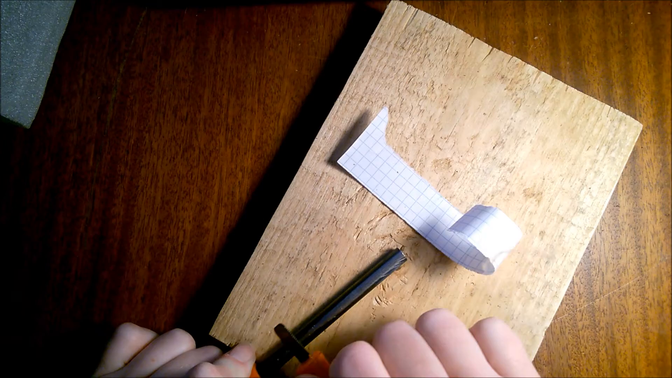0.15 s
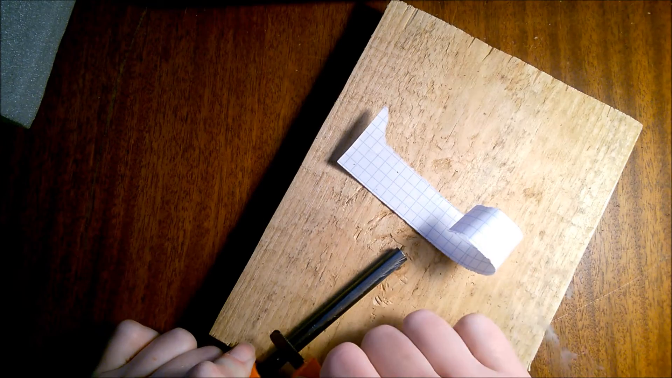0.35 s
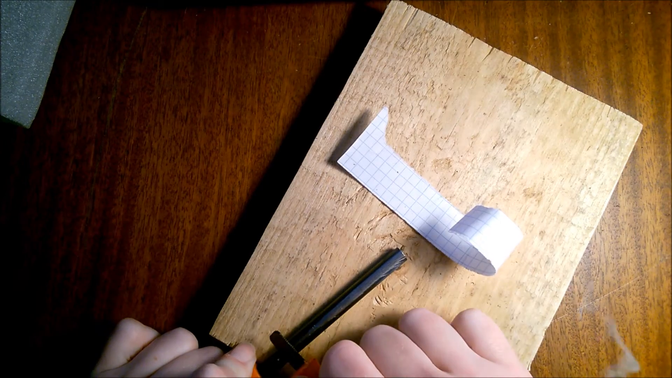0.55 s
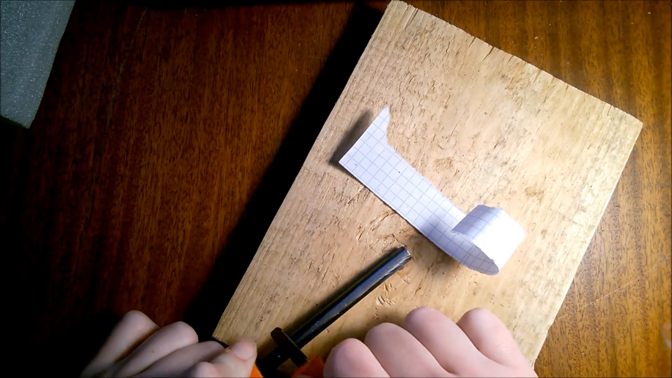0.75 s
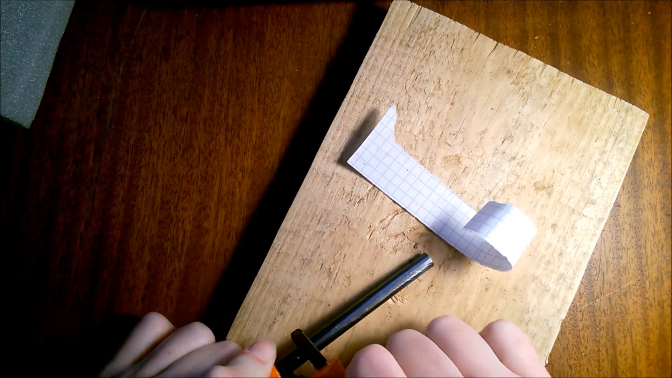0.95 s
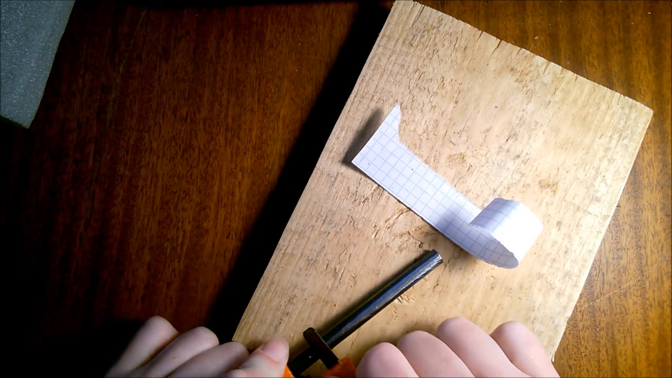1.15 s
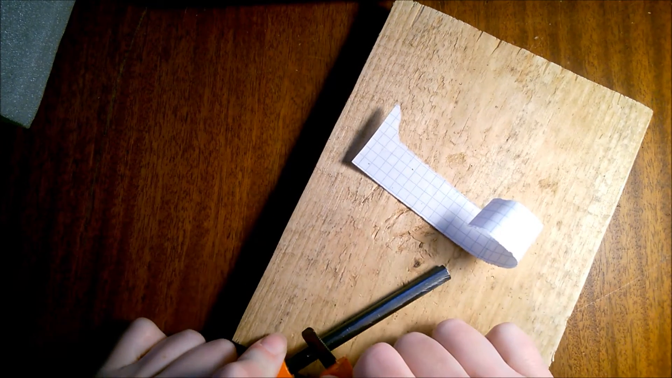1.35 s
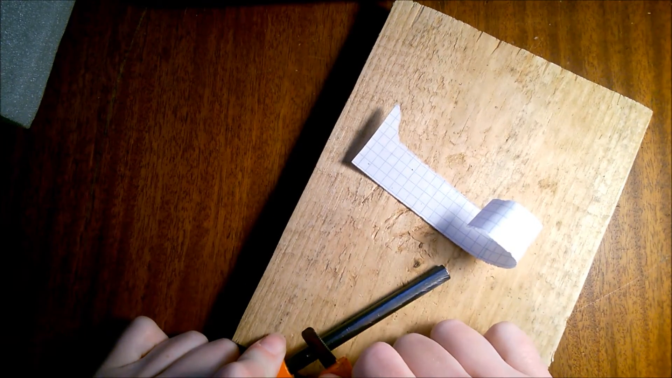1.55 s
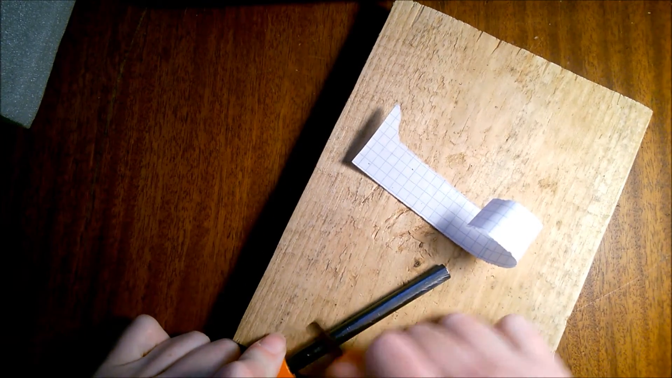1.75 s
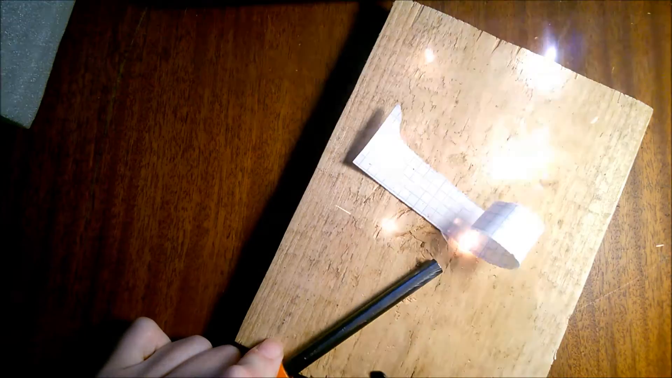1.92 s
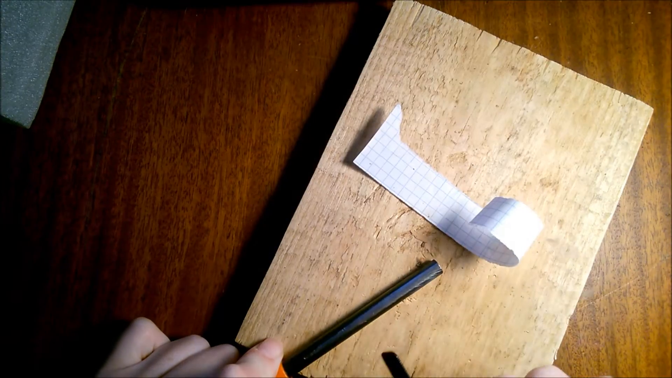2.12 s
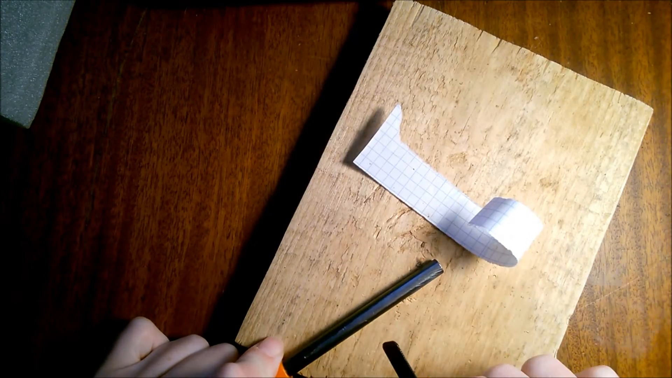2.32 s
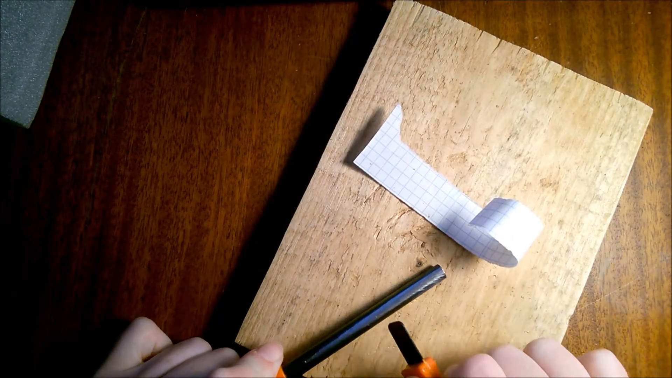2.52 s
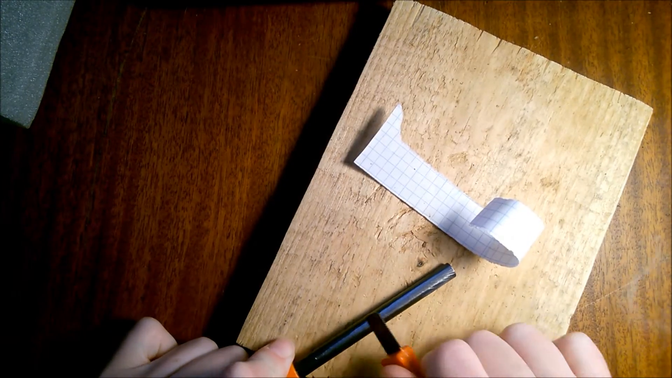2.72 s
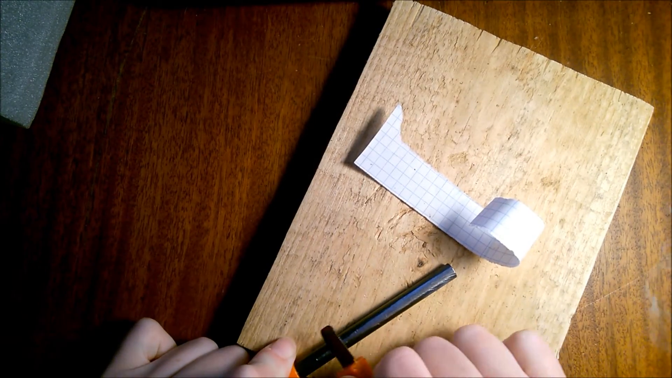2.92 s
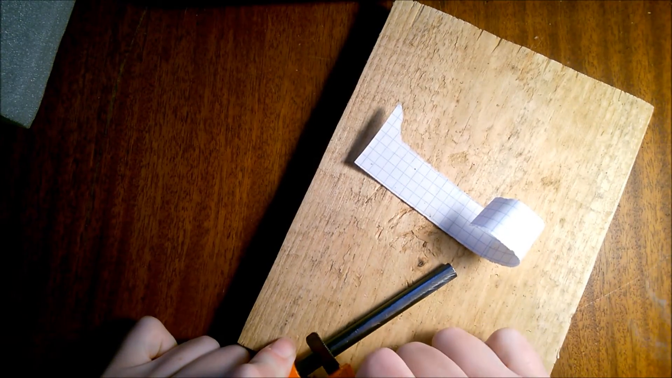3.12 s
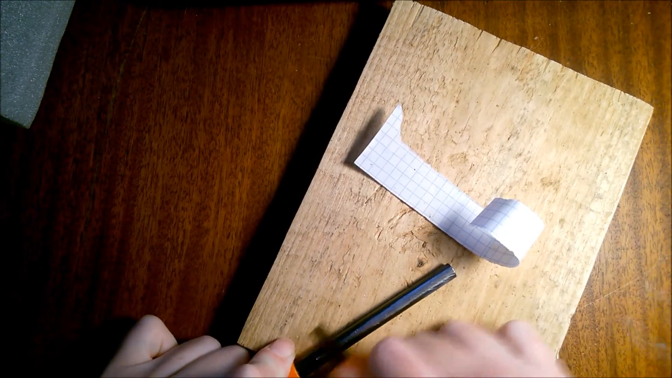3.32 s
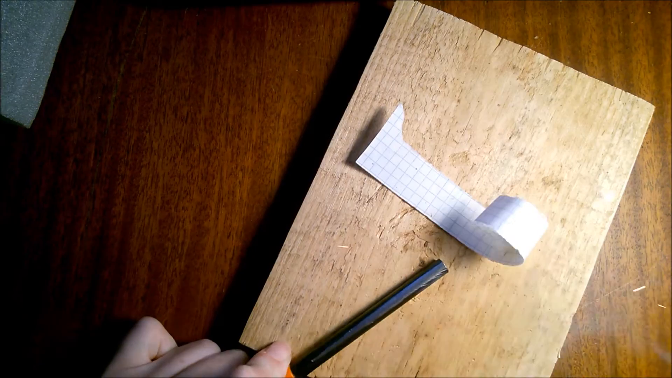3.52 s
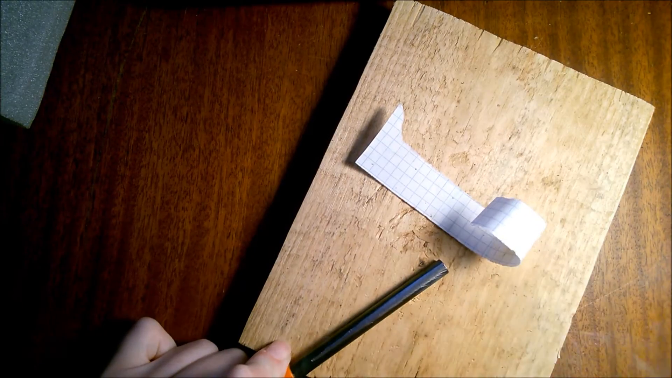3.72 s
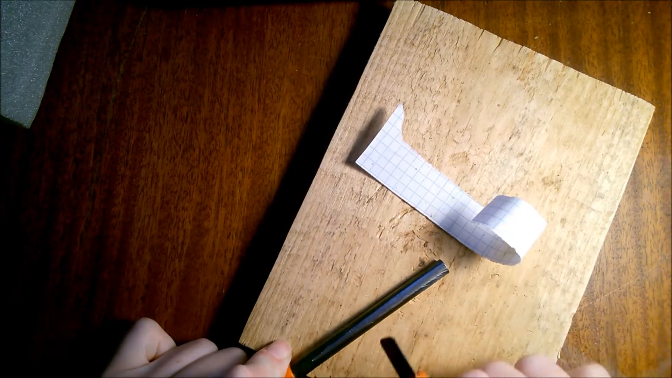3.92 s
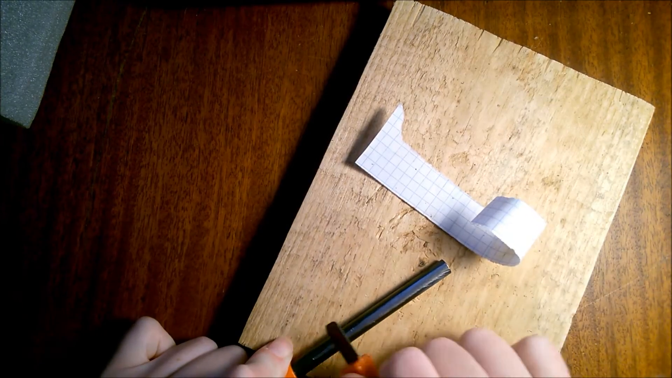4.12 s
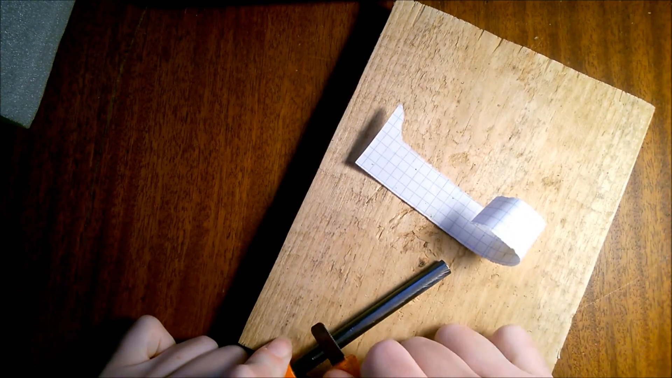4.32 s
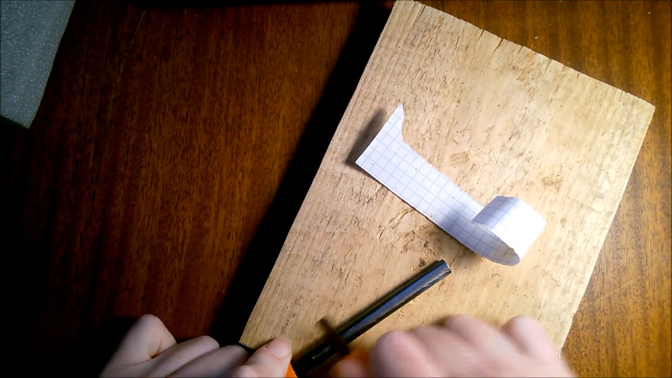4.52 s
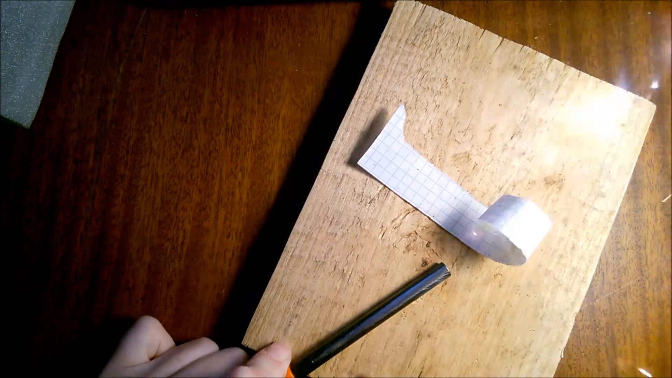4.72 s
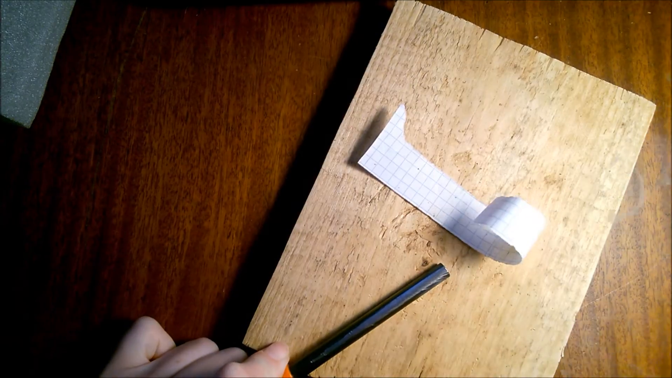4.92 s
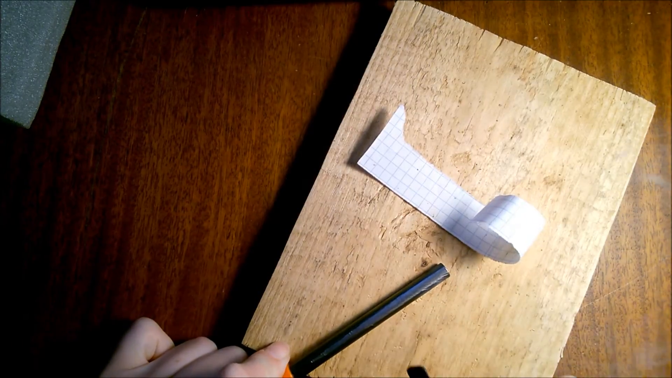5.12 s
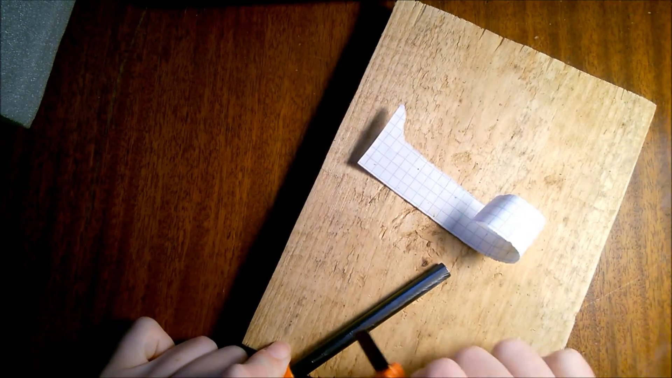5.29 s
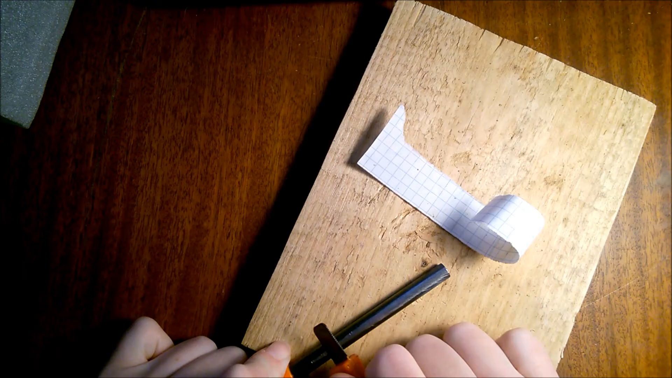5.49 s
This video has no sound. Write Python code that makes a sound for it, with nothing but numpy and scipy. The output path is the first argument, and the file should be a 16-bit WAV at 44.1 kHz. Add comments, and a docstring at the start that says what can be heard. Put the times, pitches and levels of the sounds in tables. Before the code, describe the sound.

A steel striker slides and taps, then scrapes a fire-starting rod hard three times, each short rip spitting sizzling sparks over a wooden board.

```python
"""Striking sparks from a ferrocerium rod

A steel striker scrapes hard, three times, down a rod held on a wooden board on a table in a small room.
Streams of tiny fractures make the rasp and the fizz of sparks, and shake resonances of rod, board and table.
After a stroke the striker flies off the tip and clatters, as noisy contacts ringing the steel.
Between strokes the rod knocks on the board and the striker slides into place; echoes and a hush surround it."""
import sys
import numpy as np
from scipy import signal
from scipy.fft import rfft, irfft
from scipy.io import wavfile

SR = 44100
rng = np.random.default_rng(int(sys.argv[2]) if len(sys.argv) > 2 else 0)


def transcribe(signal):
    """Save signal, clipped to [-1, 1], as a 16-bit WAV file at the path in sys.argv[1]."""
    frames = np.atleast_2d(signal).T
    limited = np.clip(frames, -1, 1)
    pcm = np.round(limited * 32767).astype(np.int16)
    wavfile.write(sys.argv[1], SR, pcm)


N = 244755
T = np.arange(N) / SR  # time in seconds
HZ = np.fft.rfftfreq(8192, 1 / SR) + 1  # frequency grid, kept above zero for logarithms
BEND_HZ = 1175  # the rod's bending mode while it is pressed for a stroke


def undb(db):
    """Decibels to gain."""
    return 10 ** (np.asarray(db) / 20)


def unit(x):
    """Scale to rms 1."""
    return x / np.sqrt(np.mean(x ** 2))


def even(response):
    """Scale a response to unit energy."""
    return response / np.linalg.norm(response)


def through(x, response):
    """Pass a sound through an impulse response."""
    return signal.fftconvolve(x, response)[:len(x)]


def causal(gain):
    """The promptest (minimum-phase) response with this gain at each of HZ, up to a common factor."""
    cepstrum = irfft(np.log(gain))
    half = len(cepstrum) // 2
    # fold the cepstrum onto positive time
    cepstrum[1:half] *= 2
    cepstrum[half:] = 0
    return even(irfft(np.exp(rfft(cepstrum))))


def colour(points):
    """Response with a smooth spectrum, drawn through points on a logarithmic frequency axis."""
    hz, db = np.transpose(points)
    return causal(undb(np.interp(np.log(HZ), np.log(hz), db)))


def ring(modes):
    """Response of a body: resonances with dark valleys between them."""
    gain = 0
    for hz, width_hz, db in modes:
        detuning = 2 * (HZ - hz) / width_hz
        gain = gain + undb(db) / (1 + detuning ** 2) ** (3 / 4)
    return causal(gain)


def soften(x, hz):
    """A softer contact loses its treble above hz."""
    b, a = signal.butter(2, min(hz, SR / 2 - 1000), fs=SR)
    return signal.lfilter(b, a, x)


def crack(decay_s, hz, octaves):
    """A burst of noise around a pitch, dying fast."""
    spectrum = rfft(rng.standard_normal(2 * len(HZ) - 2))
    band = np.exp(-(np.log2(HZ / hz) / octaves) ** 2 / 2)
    noise = irfft(spectrum * band)
    return even(noise * np.exp(-T[:len(noise)] / decay_s))


def chatter(body, decay_s):
    """Hard parts meet in a flurry of tiny contacts, each ringing the body."""
    contacts = rng.standard_normal(len(body)) * np.exp(-T[:len(body)] / decay_s)
    return even(through(body, contacts))


def blow(s, db, shape):
    """Place one blow; its level is its energy spread over 5 ms."""
    span = .005 * SR
    return np.pad(even(shape) * undb(db) * np.sqrt(span), (int(s * SR), N))[:N]


def walk(rate):
    """Random levels joined by lines, rate of them a second."""
    return np.interp(T * rate, np.arange(N), rng.standard_normal(N))


def chips(rate, spread_db):
    """A stream of tiny fractures of unequal size, about rate a second, rms 1."""
    happens = rng.random(N) < rate / SR
    sign = rng.choice([-1, 1], N)
    size = undb(spread_db * np.clip(rng.standard_normal(N), -2, 2))
    return unit(happens * sign * size)


def swell(start_s, rise_s, power):
    """Gain of a contact that speeds up evenly from rest: a power of the speed."""
    return np.clip((T - start_s) / rise_s, 0, 1) ** power


def fade(from_s, db_per_s):
    """Gain that holds, then falls steadily."""
    return undb(-db_per_s * np.maximum(T - from_s, 0))


# Spectrum of the edge's rasp up close. Each row: frequency in Hz, relative level in dB per Hz.
RASP = [(100, -6.5), (400, -8), (620, -7), (950, -8), (1500, -1.5), (1800, 1), (2450, 4), (3050, -1),
        (3750, -2.5), (4400, 1.5), (5500, -1.5), (10200, -1), (12500, -9.5), (16000, -19)]
# Spectrum of the sparks' fizz. Each row: frequency in Hz, relative level in dB per Hz.
FIZZ = [(3000, -42), (8000, -15.5), (11000, -3), (13800, 0.5), (16000, -2)]


def scrapes(slip_rate=600, slip_db=1.6, board_db=-22):
    """The edge catches and slips; chips rasp, ring the rod, shake board and table and, struck hard, ignite."""
    grip = unit(undb(slip_db * np.clip(walk(slip_rate), -2, 2)))
    jolts = chips(rate=1700, spread_db=6)
    edge = through(chips(rate=11000, spread_db=3.0) * grip, colour(RASP))
    rasp = edge + undb(board_db) * through(jolts, board_response())
    fizz = through(chips(rate=3800, spread_db=6.5) * grip, colour(FIZZ))
    judder = chips(rate=4400, spread_db=2) * grip
    rumble = through(jolts, table_response())
    return strokes(rasp, judder, fizz, rumble) + slides(rasp, judder)


# Hard strokes down the rod; the short ones are the edge catching again near the tip.
# Each row: start in seconds, speeding up in seconds, full bite in seconds, rasp level in dB,
# rod ring level in dB, spark fizz level in dB, table rumble level in dB.
STROKES = [(1.778, .053, .047, -15.5, -18, -20.5, -28.5), (3.351, 0.048, .033, -12.5, -16, -21.5, -32),
           (3.465, 0.017, .014, -24, -50, -29.5, -41), (4.549, .051, .022, -12, -15.5, -20.5, -30.5),
           (4.645, 0.011, .003, -20.5, -46, -34, -33.5), (4.667, 0.014, .004, -16.5, -36, -28, -32)]
SPEED_POWER, RING_POWER = 1.75, 1.4  # rasp grows as a power of speed; the rod rings from the first touch
RELEASE_DB_PER_S, RING_DAMP_DB_PER_S = 900, 400  # the edge lifts; the ring is choked once the edge bites
BEND_DB = 11.5  # the bending mode's share of the rod's ring
PRESS_S = .028  # the weight of the stroke comes onto the table quickly
IGNITE_S, IGNITE_POWER, FIZZ_FADE_DB_PER_S = .022, 4.0, 89  # chips catch abruptly, then the shower thins
EMBER_DB, EMBER_DB_PER_S = -24, 200  # flying sparks sizzle on after the stroke


def strokes(rasp, judder, fizz, rumble):
    """Hard strokes: the rod rings first, sparks catch, the rasp peaks at full speed and sizzles away."""
    out = np.zeros(N)
    pressed_rod = through(judder, rod(BEND_HZ, BEND_DB))
    for s, rise_s, bite_s, rasp_db, ring_db, fizz_db, rumble_db in STROKES:
        lift_s = s + rise_s + bite_s
        contact = fade(lift_s, RELEASE_DB_PER_S)
        burn = np.maximum(contact, undb(EMBER_DB) * fade(lift_s, EMBER_DB_PER_S))
        rasp_gain = swell(s, rise_s, SPEED_POWER) * burn
        rumble_gain = swell(s, PRESS_S, 2) * contact
        ring_gain = swell(s, rise_s, RING_POWER) * fade(s + rise_s, RING_DAMP_DB_PER_S) * contact
        fizz_gain = swell(s, IGNITE_S, IGNITE_POWER) * fade(s + IGNITE_S, FIZZ_FADE_DB_PER_S) * burn
        out += undb(rasp_db) * rasp_gain * rasp
        out += undb(rumble_db) * rumble_gain * rumble
        out += undb(ring_db) * ring_gain * pressed_rod
        out += undb(fizz_db) * fizz_gain * fizz
    return out


# The striker slides lightly into place on the rod.
# Each row: start in seconds, rise in seconds, hold in seconds, time to fall 20 dB in seconds,
# rasp level in dB, rod ring level in dB, bending mode in Hz, that mode's share in dB.
SLIDES = [(.6, .32, .03, .09, -55, -52.5, 1810, -3), (1.09, 0.053, .008, .06, -70, -66, 1800, -4.5),
          (1.192, .069, .05, .028, -45.5, -43, 600, -1), (2.852, .01, .035, .07, -67, -38, BEND_HZ, 23),
          (2.905, .056, .008, .065, -72, -36, BEND_HZ, 24), (2.9, .122, 0.0035, .055, -71, -46, 2980, 12)]


def slides(rasp, judder, power=2.7, snag_rate=170, snag_db=1.8, top_hz=9500):
    """Light slides swell from nothing and snag unevenly: the rod sings over a dulled rasp, with no sparks."""
    out = np.zeros(N)
    light_rasp = soften(rasp, top_hz)
    snag = unit(undb(snag_db * walk(snag_rate)))
    for s, rise_s, hold_s, fall_s, rasp_db, ring_db, bend_hz, bend_db in SLIDES:
        touch = snag * swell(s, rise_s, power) * fade(s + rise_s + hold_s, 20 / fall_s)
        singing_rod = through(judder, rod(bend_hz, bend_db))
        out += touch * (undb(rasp_db) * light_rasp + undb(ring_db) * singing_rod)
    return out


# Fixed resonances of the rod. Each row: frequency in Hz, width in Hz, relative level in dB.
ROD = [(558, 33, -8.5), (1810, 300, -11.5), (2720, 380, -6.5), (3210, 130, -1.5), (4070, 1000, -20),
       (5600, 400, -16), (6200, 450, -6), (9050, 450, -17), (10100, 200, -22)]


def rod(bend_hz, bend_db, width_hz=150):
    """The rod's fixed modes under a bending pair whose strength depends on where it is pressed."""
    bending_pair = [(bend_hz, width_hz, bend_db), (825, 80, bend_db - 9)]
    return ring(bending_pair + ROD)


# Resonances of the loose striker. Each row: frequency in Hz, width in Hz, relative level in dB.
STRIKER = [(1790, 260, 11.5), (2300, 200, 4), (2554, 260, 10), (3314, 670, -1.5), (3725, 390, 6),
           (5100, 660, -1), (5670, 850, 1), (6940, 550, -20), (9000, 2700, 0.5), (10400, 1000, -19)]
# The striker clacks as it flies off the tip or is jostled in the hand.
# Each row: start in seconds, level in dB of the clack after its treble is softened, brightness in Hz.
CLACKS = [(.402, -55, 2400), (2.051, -29, 7500), (3.4489, -17.5, 13230), (3.5428, -14.5, 9200),
          (3.562, -22.5, 5040), (4.718, -14, 4600), (4.7403, -27, 5000), (5.139, -64, 1494),
          (5.162, -52.5, 1498)]
# It then rattles to rest. Each row: start in seconds, level in dB, first gap in seconds, number of bounces.
RATTLES = [(3.576, -26, .013, 3), (4.761, -27, .0085, 4)]
GAP_SHARE, BOUNCE_LOSS_DB, RATTLE_HZ = .75, 1.3, 3900  # each bounce comes sooner and weaker than the last


def clacks(crack_db=-7):
    """The loose striker clacks and rattles: flurries of contacts ring the steel, with a burst of noise."""
    out = np.zeros(N)
    body = ring(STRIKER)
    bounces = []
    for s, db, gap_s, count in RATTLES:
        for k in range(round(count)):
            delay_s = gap_s * sum(GAP_SHARE ** np.arange(k))
            bounces.append((s + delay_s, db - k * BOUNCE_LOSS_DB, RATTLE_HZ))
    for s, db, hz in list(CLACKS) + bounces:
        steel = chatter(body, decay_s=.0035)
        click = undb(crack_db) * crack(decay_s=0.0026, hz=4170, octaves=1.9)
        out += blow(s, db, soften(steel + click, hz))
    return out


# The striker touches the rod. Each row: start in seconds, level in dB, bending mode in Hz,
# that mode's share in dB, sharp tick in dB within the blow.
TAPS = [(0.279, -29, 1420, 3, -18), (1.296, -30.5, 603, -2, -4), (2.856, -35.5, BEND_HZ, 27, -36),
        (4.209, -24.5, BEND_HZ, 9, -22), (5.515, -32, BEND_HZ, 14.5, -32)]


def taps(crack_db=-10):
    """Steel set down on the rod: it ticks, chatters briefly and the rod rings."""
    out = np.zeros(N)
    for s, db, hz, share_db, tick_db in TAPS:
        body = rod(hz, share_db)
        steel = .4 * body + chatter(body, decay_s=.003)
        tick = undb(tick_db) * crack(decay_s=0.0026, hz=5450, octaves=.9)
        dull_crack = undb(crack_db) * crack(decay_s=0.0038, hz=1083, octaves=0.62)
        out += blow(s, db, steel + tick + dull_crack)
    return out


# Sparks burst in the air. Each row: start in seconds, level in dB, brightness (centre of the noise) in Hz.
POPS = [(1.913, -30, 7500), (1.951, -33, 12000), (1.978, -36, 5500), (2.002, -44, 5000), (3.498, -30, 4000),
        (3.515, -39, 12000), (4.749, -28, 10000)]


def pops():
    """Burning flakes snap in the air: short bursts of noise around a pitch."""
    return sum(blow(s, db, crack(decay_s=0.0019, hz=hz, octaves=0.88)) for s, db, hz in POPS)


# The rod tip knocks on the board.
# Each row: start in seconds, level in dB, brightness in Hz, table thud in dB.
KNOCKS = [(0.72, -35.5, 1300, -38), (.75, -28, 1130, -34.5), (0.787, -27.5, 1450, -55),
          (0.834, -37, 503, -72), (0.9, -34.5, 248, -33.5), (.934, -19, 2400, -39),
          (1.013, -33.5, 324, -35.5), (1.348, -34, 1150, -29), (2.537, -25, 3200, -37),
          (2.558, -29.5, 616, -42), (2.573, -31.5, 1197, -44), (2.593, -27.5, 1337, -36),
          (2.787, -26.5, 3800, -47), (2.798, -27.5, 2260, -28), (2.809, -24, 220, -28)]


def knocks(skid_db=-9, skid_s=0.01, give_hz=130, grit_db=-17):
    """The tip judders and skids on the gritty board; the heavy table under it swells a little later."""
    out = np.zeros(N)
    board = board_response()
    thud = soften(table_response(), give_hz)
    for s, db, hz, thud_db in KNOCKS:
        contact = .5 * board + chatter(board, decay_s=.003)
        skid = undb(skid_db) * chatter(board, skid_s)
        grit = undb(grit_db) * crack(decay_s=.005, hz=5990, octaves=0.67)
        out += blow(s, db, soften(contact + skid + grit, hz))
        out += blow(s, thud_db, thud)
    return out


# Resonances of the wooden board. Each row: frequency in Hz, width in Hz, relative level in dB.
BOARD = [(150, 18, 15.5), (203, 28, 3.5), (247, 27, 3), (381, 100, 1.5), (550, 110, -5.5), (816, 23, -5),
         (1010, 82, -0.5), (1150, 110, -0.5), (1340, 23, -9.5), (1600, 50, -3), (1900, 78, -10.5),
         (2460, 200, -19), (2710, 300, -8), (3560, 140, -14)]


def board_response():
    """The wooden board under the rod: many modes from low to high."""
    return ring(BOARD)


# Resonances of the table. Each row: frequency in Hz, width in Hz, relative level in dB.
TABLE = [(55.6, 8, -2), (92, 12, -1), (158, 25, -11)]


def table_response():
    """The heavy table under the board: a few low modes."""
    return ring(TABLE)


# The small room around the table. Each row: band centre in Hz, reverberation time in seconds, level in dB.
ROOM = [(80, 0.4, -12), (415, .31, -4.5), (1205, .25, -11), (2800, .22, -8.5), (5200, .21, -8),
        (8900, .125, -8), (15000, .088, -15.5)]


def room(first_s=0.012, size=32768):
    """Walls: a short gap, then dense echoes that lose their treble first."""
    t = T[:size]
    log_hz = np.log(np.fft.rfftfreq(size, 1 / SR) + 1)
    centres = np.log(np.array(ROOM)[:, 0])
    noise = rfft(rng.standard_normal(size))
    out = 0
    # each row of the identity selects one band, crossfading into its neighbours
    for own, (hz, t60, db) in zip(np.eye(len(ROOM)), ROOM):
        decay = even(np.exp(-np.log(1000) * t / t60))
        band = irfft(noise * np.interp(log_hz, centres, own))
        out = out + undb(db) * decay * band
    return np.pad(out, (int(first_s * SR), 0))


# Spectrum of the background hush. Each row: frequency in Hz, relative level in dB per Hz.
HUSH = [(12, -27), (20, -3), (98, -4.5), (198, -21), (270, -19.5), (367, -25), (849, -26), (1220, -29),
        (16000, -40)]


def hush(level_db=-59.5):
    """Low rumble of the house under a faint steady hiss: noise given a spectrum."""
    return undb(level_db) * through(rng.standard_normal(N), colour(HUSH))


def scene(near_db=-14, sing_db=-86):
    """All sources, scattered by the hands and table top, then by the room, where one faint tone rings on."""
    dry = scrapes() + clacks() + taps() + pops() + knocks()
    near = undb(near_db) * through(dry, crack(decay_s=.007, hz=2500, octaves=2))
    tone = np.exp(-T / .25) * np.sin(2 * np.pi * 470 * T)
    sing = undb(sing_db) * through(dry, tone)
    return (dry + near + through(dry, room()) + sing + hush())[None]


def record(dry, top_hz=16000):
    """The recorder stops at full scale and cuts the top with a steep low-pass."""
    low_pass = signal.ellip(12, .2, 90, top_hz, fs=SR, output="sos")
    return signal.sosfilt(low_pass, np.clip(dry, -1, 1))


dry = scene()
out = record(dry)
transcribe(out)
```